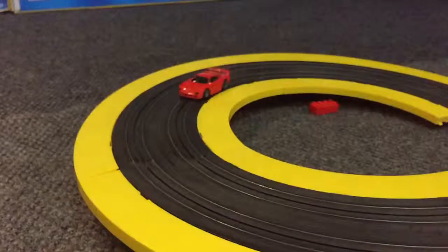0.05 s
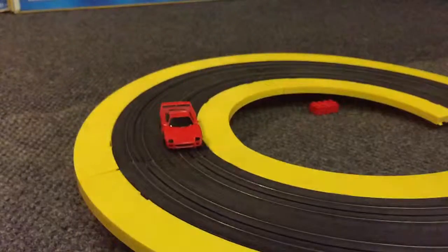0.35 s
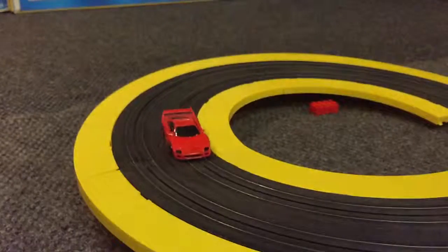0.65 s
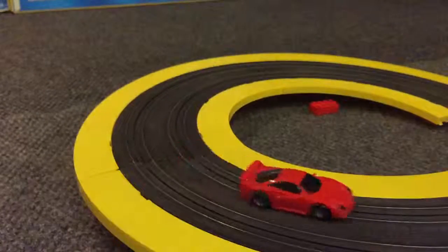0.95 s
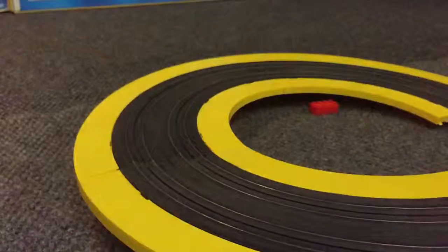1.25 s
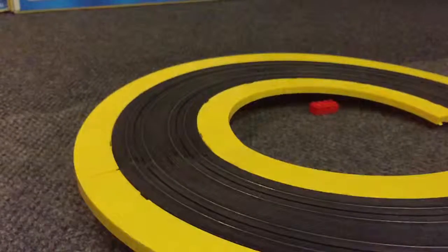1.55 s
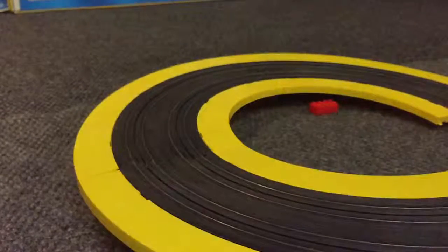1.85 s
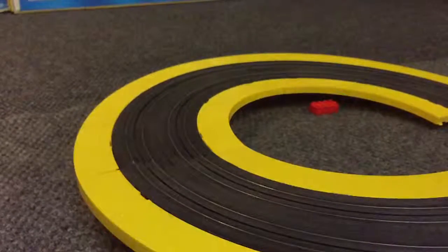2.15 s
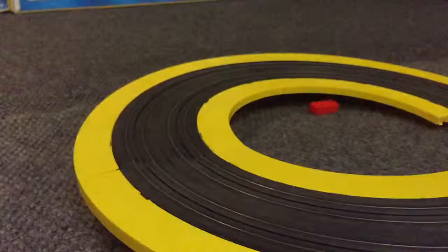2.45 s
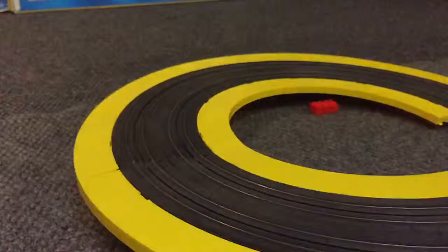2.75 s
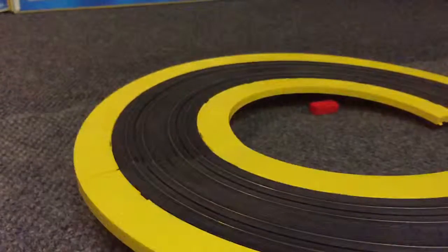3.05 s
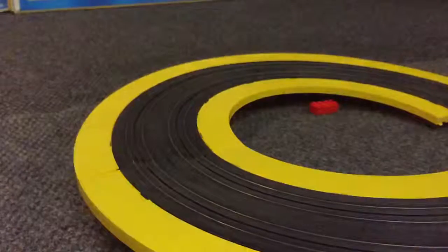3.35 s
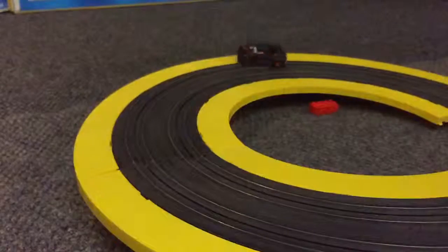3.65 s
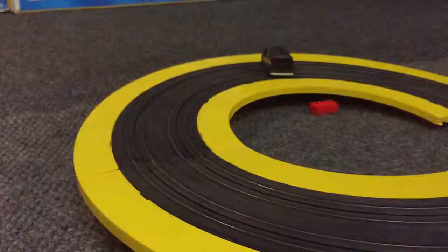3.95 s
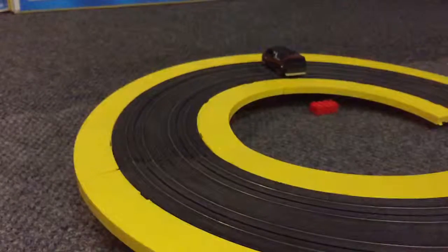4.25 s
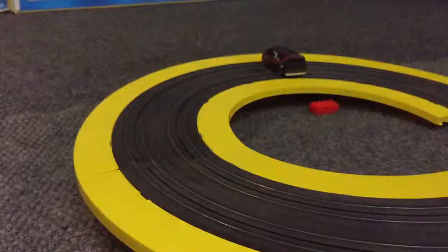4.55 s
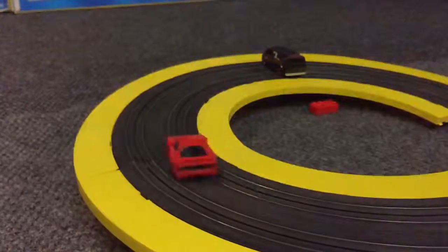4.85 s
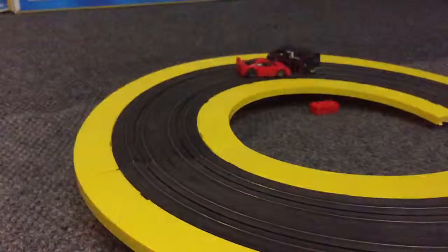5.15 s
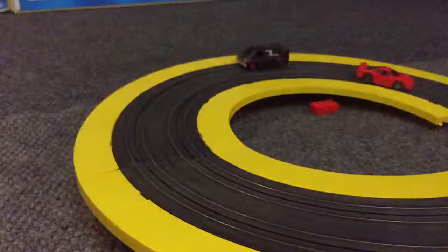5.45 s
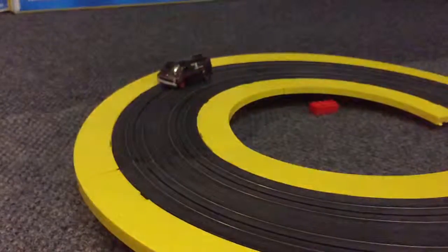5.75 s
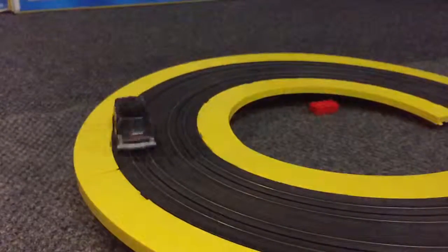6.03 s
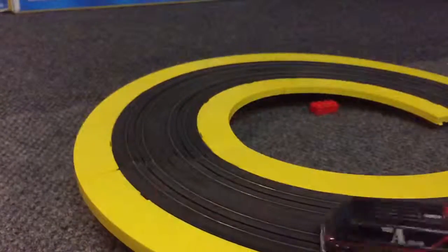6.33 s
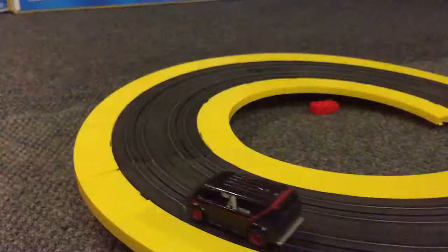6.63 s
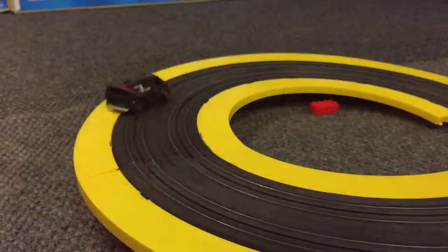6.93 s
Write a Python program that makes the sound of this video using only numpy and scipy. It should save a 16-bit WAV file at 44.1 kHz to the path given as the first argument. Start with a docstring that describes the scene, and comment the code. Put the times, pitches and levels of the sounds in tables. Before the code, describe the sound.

Two toy slot cars whir, hiss and rattle around a hollow plastic track, clicking over the joints close by.

```python
"""Tyres drum on a hollow plastic track as two toy slot cars lap it, close by, on a carpet.
Gears and guide pins rattle the shells, and pickup shoes hiss along the metal rails. The red car
stalls, creaks and shudders off again; cars scrape through bends and knock over joints. Near the end
a shoe sings and the van clatters through the near bend. A faint mains hum lies in the small, dead room."""
import sys
import numpy as np
from scipy import signal
from scipy.fft import rfft, irfft
from scipy.io import wavfile
from scipy.ndimage import map_coordinates

SR = 44100
rng = np.random.default_rng(int(sys.argv[2]) if len(sys.argv) > 2 else 0)


def to_wav(sig):
    """Store sig (one row per channel, or 1-D mono) as 16-bit WAV at the path in sys.argv[1].

    Samples outside -1..1 are clipped; the rate is SR.
    """
    pcm = np.clip(np.atleast_2d(sig), -1, 1) * 32767
    pcm = np.round(pcm).astype(np.int16)
    wavfile.write(sys.argv[1], SR, pcm.T)  # frames by channels


N = 312669
T = np.arange(N) / SR
BINS_HZ = np.arange(N // 2 + 1) * SR / N


# how hard the cars run as they lap: time_s, level_db, extra_hiss_db
LAP_LEVELS = [(0, -46.5, 3.5), (0.33, -42.5, 1.5), (0.83, -45, 5), (1.07, -39.5, 2), (1.26, -36, 2.5),
              (1.285, -43.5, 3), (1.96, -42.5, 1.5), (2.18, -47.5, -0.5), (2.56, -49.5, -8.5),
              (2.89, -52, -4.5), (2.92, -47, -0.5), (3.46, -40, 0), (3.56, -42.5, 4), (4.17, -38.5, -1),
              (4.42, -44, 4), (4.51, -45, 7.5), (4.56, -39.5, 4.5), (4.75, -38, 7), (5.2, -38, 3.5),
              (5.37, -42, 1), (5.62, -40, 2.5), (5.85, -43, -2.5), (5.99, -38, 3), (6.8, -39, 7),
              (7.08, -39, 3.5)]
VAN_START_S, FAR_BELOW_DB = 2.6, -46

def rolling():
    """Levels of track, shell and shoes in dB: all follow one rolling level and the speed."""
    time_s, level_db, extra_hiss_db = np.transpose(LAP_LEVELS)
    lap_db = np.interp(T, time_s, level_db)
    rolling_db = lap_db + 20 * np.log10(stall())
    van = T > VAN_START_S  # the van rattles more and drums less
    far_db = 0.62 * np.minimum(lap_db - FAR_BELOW_DB, 0)  # far off, the shell fades fastest
    rumble_db = rolling_db + 2 - 1.35 * van
    rattle_db = rolling_db + 0.8 + 2.25 * van + far_db
    hiss_db = rolling_db + 3.5 + np.interp(T, time_s, extra_hiss_db)
    return rumble_db, rattle_db, hiss_db


def contact_pressure(turn_hz, whirr_db, chatter_db, hop_db):
    """Pressure in dB: it ripples once a gear turn, chatters, and jumps when a car lands from a hop."""
    turns = np.cumsum(turn_hz * np.exp(0.57 * walk(2) + 0.047 * walk(50))) / SR
    whirr = np.cos(2 * np.pi * turns)
    return whirr_db * whirr + chatter_db * walk(260) + hop_db * hops(rate=70, settle_s=0.0068)


# tone of the hollow track: freq_hz, gain_db
TRACK_TONE = [(100, -44.5), (230, -21.5), (340, -17), (440, -13.5), (590, -9.5), (720, 1), (860, 0),
              (1140, 2), (1220, 5.5), (1310, 2.5), (1650, 1.5), (2100, -5), (3200, -37.5)]
# the track's bass, which carries while a car is on the near bend: time_s, gain_db
TRACK_BASS = [(0, -3.5), (.9, 3.5), (1.35, -2), (1.9, -3.5), (2.7, -4), (3.2, -0.5), (3.6, -2.5), (4, 1.5),
              (4.9, 0.5), (5.7, -0.5), (6.15, 6), (6.5, -3), (7, 3)]

def track_drum(teeth, pressure_db, gain):
    """Tyres drum on the hollow track and feel every hop."""
    force = teeth * unit(undb(1.42 * pressure_db + 0.58 * walk(22))) * gain
    force = shelf(force, from_hz=620, full_hz=382, db=curve(TRACK_BASS) + 1.3 * walk(9))
    return shifting_ring(force, TRACK_TONE, detune=0.035, rate=9)


# tone of a car's shell: freq_hz, gain_db
SHELL_TONE = [(900, -30), (1500, -7.5), (1900, 2.5), (2500, 3), (3000, 3), (3500, 2.5), (3850, 4),
              (4200, 3), (4480, -3.5), (4800, -6), (7000, -14.5)]
# its top ring near 4 kHz, changing as the cars turn: time_s, gain_db
SHELL_BRIGHTNESS = [(0, 2), (1.1, -1.5), (1.45, 7), (1.85, 0.5), (2.2, 0.5), (2.7, -5), (3.2, -1.5),
                    (3.5, -1.5), (4.1, 0.5), (4.9, 0), (5.7, -1.5), (6.3, 3), (6.55, 2.5), (7, 3)]

def shell_rattle(teeth, pressure_db, gain):
    """Gear teeth shake the plastic shell."""
    force = teeth * unit(undb(1.1 * pressure_db + 1.04 * walk(25))) * gain
    force = shelf(force, from_hz=2400, full_hz=3640, db=curve(SHELL_BRIGHTNESS))
    return shifting_ring(force, SHELL_TONE, detune=0.04, rate=7)


# tone of the metal pickup shoes: freq_hz, gain_db
SHOE_TONE = [(2800, -40), (4400, -2.5), (4950, -4), (5500, -1), (6100, 2), (7500, 1), (8400, 3.5),
             (9600, 2.5), (10350, -2.5), (10900, 0.5), (13000, 0.5), (15200, -0.5)]
# their top fizz, beamed and easily shaded on the lap: time_s, gain_db
SHOE_FIZZ = [(0, 2.5), (1.6, -2.5), (2.75, -10), (3.2, -6), (3.6, -0.5), (5.1, -2.5), (5.6, 2.5),
             (6.2, -2.5), (6.7, 1), (7.09, -1)]

def shoe_hiss(pressure_db, gain):
    """Sprung shoes slide on the rails and tick as they catch on specks and seams."""
    rails = grit(rate=6000, spread_db=3.5, smooth_db=0.5)
    catch_db = 0.53 * hops(rate=110, settle_s=0.00066)
    force = rails * unit(undb(1.75 * pressure_db + catch_db)) * gain
    force = shelf(force, from_hz=6200, full_hz=12200, db=curve(SHOE_FIZZ) + 0.47 * walk(27))
    return ring(force, colour(SHOE_TONE))


def pin_rattle(rate=330, low_hz=1000, high_hz=4400, decay_cycles=4.5, spread_db=14.5, bunching=0.6):
    """The guide pin taps the slot walls in flurries; every tap has its own pitch and strength."""
    starts = np.flatnonzero(rng.random(N) < rate / SR * np.exp(bunching * walk(18)))
    age, taps = T[:SR // 100], np.zeros(N + SR)
    for start, (pitch, size) in zip(starts, rng.random((len(starts), 2))):
        hz = low_hz * (high_hz / low_hz) ** pitch
        envelope = undb(spread_db * size) * np.sqrt(hz) * np.exp(-age * hz / decay_cycles)
        taps[start:start + len(age)] += envelope * np.sin(2 * np.pi * hz * age)
    # the slot walls radiate only within the range of their modes
    return unit(butter(taps[:N], 6, [low_hz, high_hz], "bandpass"))


# mains hum: pitch_hz, level_db
HUM_TONES = [(49.5, -81), (59.3, -77.5), (120, -79)]
# tone of the still air: freq_hz, gain_db
AIR_TONE = [(20, -48), (36, -25), (55, -9), (85, -13), (130, -6.5), (190, -4.5), (400, -17), (1200, -24),
            (2500, -32), (5000, -17), (15000, -55)]

def hum_and_air(waver_db=1.5, air_db=-71):
    """Still air and a slightly wavering electrical hum whose two lowest tones beat."""
    hum = 0
    for hz, db in HUM_TONES:
        amplitude = np.sqrt(2) * undb(db + waver_db * walk(2.94))
        hum += amplitude * np.sin(2 * np.pi * (hz * T + rng.random()))
    return hum + undb(air_db) * ring(rng.standard_normal(N), colour(AIR_TONE))


def stall(halt_s=0.44, coast_s=0.13, restart_s=0.62, speed_up_s=0.25):
    """Gain from speed: the red car coasts evenly to a halt, stands, then gathers speed evenly."""
    speed = np.clip(np.maximum((halt_s - T) / coast_s, (T - restart_s) / speed_up_s), 0, 1)
    return speed ** 1.33 + undb(-45)  # a little still stirs at rest


# bumps, skids and grinds: start_s, length_s, level_db, hiss_offset_db, rumble_offset_db
SLOT_SCRAPES = [ (0.382, .04, -58, 2, -9), (0.52, .013, -57.5, -9, -25), (0.558, 0.064, -69, -9, -7),
                (0.616, 0.0022, -51, 3, 1.5), (0.624, 0.013, -58, -12, 6), (.67, 0.044, -57, 2, -1.5),
                (0.757, .003, -41, 9.5, -17), (0.775, 0.029, -44.5, 7, -6), (0.97, .004, -32.5, 2.5, -3),
                (0.983, 0.0064, -36, 4, 2), (1.038, 0.0054, -35, 3, 3.5), (1.066, 0.0039, -44, -5, 6.5),
                (1.1, 0.0074, -28, -0.5, -12), (1.152, 0.028, -38.5, 9, -4), (1.172, 0.0045, -32, -2, -1),
                (1.178, 0.028, -45.5, -4, 8), (1.218, .01, -35, 5, -2), (1.246, 0.0066, -35, 8, -5),
                (1.258, 0.0091, -34.5, 9.5, -5), (1.638, 0.0078, -37.5, 5.5, 2.5),
                (1.661, 0.015, -35.5, 4.5, 1), (2.103, .009, -38, 5, -4), (2.109, 0.0098, -35.5, -3, -2),
                (2.249, 0.015, -41.5, 3, 0), (2.264, 0.028, -46.5, 2, 4.5), (2.37, 0.046, -42.5, -5, 2.5),
                (2.624, 0.0092, -40, 0, -8), (2.633, 0.054, -44, 0, -6), (2.916, 0.0074, -45.5, 6, -15),
                (2.954, 0.011, -40, 2.5, -1), (2.995, .013, -37, -1, -5), (3.072, .006, -37, -5, -17),
                (3.262, 0.014, -35, 4, -8), (3.322, 0.012, -30, -7, -7), (3.453, 0.0089, -34, -4, -1),
                (3.47, 0.014, -29.5, 1, -4), (3.688, .004, -41, 12, -8), (3.774, 0.028, -36, -5, -4),
                (3.838, 0.022, -35, -3, -1), (3.994, 0.026, -36, 4.5, 0.5),
                (4.084, 0.0058, -28.5, -2, -3.5), (4.108, 0.036, -37.5, 1, -2),
                (4.176, .0053, -32.5, 4, -14), (4.338, .005, -34.5, 0, -1),
                (4.4418, 0.0038, -37.5, 14, -17), (4.449, 0.012, -31.5, 5, -2),
                (4.605, 0.0041, -38.5, 6, 5), (4.751, .008, -27.5, 5, -3), (4.765, .004, -32, 6, 3.5),
                (4.846, 0.0046, -29, -3, 0), (4.869, .005, -28, 1.5, -11), (4.924, 0.0062, -38.5, -2, 7.5),
                (4.946, 0.034, -36.5, 7, -3), (5.002, 0.0087, -45, 1.5, 8), (5.228, 0.0042, -25, -4, -13),
                (5.2373, 0.0055, -24, 6.5, -4), (5.458, 0.0053, -35.5, 3.5, 3), (5.645, 0.04, -35, 0, -10),
                (5.952, 0.0054, -30, -5, -16), (6.18, 0.021, -32, 5, -7),
                (6.285, 0.027, -35.5, -10.5, -2.5), (6.473, 0.0067, -25, -1, -2),
                (6.502, .004, -28, 2, -13), (6.515, .003, -31, 1, -16), (6.563, .003, -28.5, 0, -8),
                (6.682, 0.032, -30, 1, -6), (6.73, .003, -31, 3.5, -8), (6.743, 0.0097, -37, -4, 1.5),
                (6.788, .008, -31.5, -6, -13), (6.88, .022, -39, 9, -18)]

def scrapes():
    """Extra power that a car scraping in the slot puts into track, shell and shoes."""
    power = np.zeros((3, N))
    for start_s, length_s, db, hiss_db, rumble_db in SLOT_SCRAPES:
        power += (undb([[rumble_db], [0], [hiss_db]]) * burst(start_s, length_s, db)) ** 2
    return power


# hits on the track joints: start_s, level_db, pitch_hz, rise_ms
JOINT_KNOCKS = [(.523, -46, 3070, 2.2), (.6175, -44, 1000, 1.2), (1.2545, -21, 3600, .5),
                (1.2665, -21, 2900, .5), (2.6256, -16, 2500, .5), (2.999, -32, 2500, 1),
                (3.4715, -19, 1900, .35), (4.1762, -17, 13000, .4), (4.4424, -16, 7000, .25),
                (5.2382, -17, 9000, .3), (5.2435, -15, 3000, .5), (4.850, -20, 3300, .9),
                (6.301, -17, 2000, .6), (6.4545, -19, 2600, .9), (6.4733, -7.5, 2500, .6),
                (6.5057, -14, 3300, .6), (6.6855, -17, 2700, .9), (6.818, -19, 1250, 1.1)]

def knocks(crack_db=-17, crack_decay_s=0.0017):
    """Pin or chassis strikes a joint: a treble crack, and a brief swell of well-damped plastic."""
    body, crack = np.zeros(N), np.zeros(N)
    for start_s, db, hz, rise_ms in JOINT_KNOCKS:
        span = slice(int(start_s * SR), int((start_s + 0.04) * SR))
        age = np.maximum(T[span] - start_s, 0)
        swell = 1000 * age / rise_ms
        body[span] += undb(db) * (swell * np.exp(1 - swell)) ** 2 * np.sin(2 * np.pi * hz * age)
        crack[span] += undb(db + crack_db) * np.exp(-age / crack_decay_s)
    body = butter(body, 2, 400, "highpass")  # the knocks carry no deep bass
    return body + ring(crack * rng.standard_normal(N), colour(SHOE_TONE))


# ring of the creak: pitch_hz, width_hz, gain_db
CREAK_RING = [(2085, 30, 0), (2680, 110, -14)]

def shoe_creak(slips):
    """A shoe sticks and slips as the stalled car starts to creep."""
    return resonate(slips * burst(start_s=0.55, length_s=0.065, db=-63), CREAK_RING)


# ring of the shudder: pitch_hz, width_hz, gain_db
SHUDDER_RING = [(3200, 280, -6), (4060, 170, 4)]

def red_shudder(taps):
    """The red car's body shudders as its tyres bite again."""
    return resonate(taps * burst(start_s=0.745, length_s=0.06, db=-34.5), SHUDDER_RING)


# each car's sweeps through the near bend: nearest_s, level_db, approach_s, retreat_s
RED_SWEEPS = [(1.16, -34.5, 0.11, 0.1), (4.83, -33.5, 0.11, 0.065)]
VAN_SWEEPS = [(6.47, -35.5, 0.12, 0.12), (6.77, -32.5, 0.053, 0.085)]
# ring of the red car's thin body and of the van's: pitch_hz, width_hz, gain_db
RED_RING = [(720, 58, -1), (3260, 200, -2.5), (3690, 120, -4), (4120, 134, -1.5)]
VAN_RING = [(310, 28, -9.5), (433, 61, -10.5), (737, 100, 6.5), (1290, 120, -15), (2570, 200, -1),
            (3020, 770, 6.5)]

def pass_by(taps, sweeps, modes, falloff=1.15):
    """A tapping body rings louder as it comes near and fades as it leaves."""
    power = 0
    for nearest_s, db, approach_s, retreat_s in sweeps:
        distance = np.hypot(1, (T - nearest_s) / np.where(T < nearest_s, approach_s, retreat_s))
        power += (undb(db) / distance ** falloff) ** 2
    return resonate(taps * np.sqrt(power), modes)


# ring of the singing shoe: pitch_hz, width_hz, gain_db
SHOE_RING = [(4620, 200, -2), (6100, 310, 0), (8380, 290, 2.5)]

def singing_shoe(slips, peak_s=6.19, peak_db=-29.5, rise_db_per_s=65, fall_db_per_s=330):
    """Stick and slip rings the thin pickup strip in the near bend: it builds, squeals and dies."""
    fade_db = np.maximum((peak_s - T) * rise_db_per_s, (T - peak_s) * fall_db_per_s)
    squeal = burst(start_s=6.172, length_s=0.021, db=-26)
    return resonate(slips * np.hypot(undb(peak_db - fade_db), squeal), SHOE_RING)


# volleys of clatter: start_s, length_s, level_db
CLATTER_VOLLEYS = [(6.426, .024, -29), (6.447, .005, -23), (6.475, .004, -24), (6.497, .004, -29),
                   (6.502, .006, -23), (6.517, .004, -23.5), (6.536, .012, -28), (6.579, .012, -28),
                   (6.605, .004, -28), (6.668, .005, -29), (6.678, 0.0077, -22), (6.691, 0.021, -27.5),
                   (6.744, .008, -32), (6.77, .005, -31)]
# ring of the clatter: pitch_hz, width_hz, gain_db
CLATTER_RING = [(2040, 150, -3), (2600, 280, 1), (3200, 220, -4.5), (3950, 250, -5)]

def van_clatter():
    """In the near bend the van's loose shell hits its chassis in dense volleys of small taps."""
    volleys = np.sqrt(sum(burst(*row) ** 2 for row in CLATTER_VOLLEYS))
    return resonate(grit(rate=3000, spread_db=2, smooth_db=-1) * volleys, CLATTER_RING)


def cars():
    """One contact pressure drives the friction in track, shell and shoes and the bouncing bodies."""
    rumble_db, rattle_db, hiss_db = rolling()
    pressure_db = contact_pressure(turn_hz=126, whirr_db=0.1, chatter_db=0.25, hop_db=0.87)
    pressure_db *= np.interp(rumble_db, [-47, -38], [0.65, 1.05])  # the room smooths distant running
    load_db = 0.5 * walk(12)  # swells and eases from one piece of track to the next
    rolling_power = undb(np.array([rumble_db, rattle_db, hiss_db]) + load_db) ** 2
    track_gain, shell_gain, shoe_gain = np.sqrt(rolling_power + scrapes())
    teeth = roam(grit(rate=2600, spread_db=2, smooth_db=-1), depth_db=2.3, rate=11)
    track = track_drum(teeth, pressure_db, track_gain)
    shell = shell_rattle(teeth, pressure_db, shell_gain)
    shoes = shoe_hiss(pressure_db, shoe_gain)
    pin = pin_rattle() * undb(rattle_db - 6)
    # loose bodies bounce on their chassis in fewer, harder taps
    taps = grit(rate=1100, spread_db=1.5, smooth_db=-4) * unit(undb(3 * pressure_db)) * stall()
    red = red_shudder(taps) + pass_by(taps, RED_SWEEPS, RED_RING)
    van = pass_by(taps, VAN_SWEEPS, VAN_RING)
    return track + shell + shoes + pin + red + van


def room(x, echo_db, tail_db, t60_s):
    """Add a near reflection and the short tail of a carpeted room; both shift as the cars move."""
    lag_s = 0.0023 + 0.000378 * walk(2.5)
    echo = np.interp(T - lag_s, T, x)
    tails = np.array([reverb(x, t60_s, gap_s=0.004) for _ in range(4)])
    shares = np.array([walk(5) for _ in tails])
    shares /= np.linalg.norm(shares, axis=0)
    return x + undb(echo_db) * echo + undb(tail_db) * np.sum(shares * tails, axis=0)


def far_walls(x, level_db, t60_s, dull_hz):
    """A faint, dull tail comes back from the far walls."""
    return undb(level_db) * reverb(butter(x, 2, dull_hz, "lowpass"), t60_s, gap_s=0.015)


def reverb(x, t60_s, gap_s):
    """Dense reflections: a tail of decaying noise after a short gap."""
    age = T[:SR // 2]
    tail = rng.standard_normal(len(age)) * undb(-60 * age / t60_s) * (age > gap_s)
    return signal.fftconvolve(x, tail / np.linalg.norm(tail))[:N]


def undb(db):
    """Decibels to gain."""
    return 10 ** (np.asarray(db) / 20)


def unit(x):
    """Scale to rms 1."""
    return x / np.sqrt(np.mean(x ** 2))


def curve(points):
    """A fader move through (time_s, gain_db) points."""
    return np.interp(T, *np.transpose(points))


def walk(rate):
    """Smooth random wander of spread 1, through `rate` values a second."""
    knots = rng.standard_normal(N // 16)
    return unit(map_coordinates(knots, [T * rate], order=2, mode="wrap"))


def hops(rate, settle_s):
    """Sudden rises of pressure at random moments, each settling quickly; spread 1."""
    kicks = (rng.random(N) < rate / SR) * rng.uniform(0.83, 1, N)
    load = signal.lfilter([1], [1, -np.exp(-1 / (settle_s * SR))], kicks)
    return unit(load - load.mean())


def grit(rate, spread_db, smooth_db):
    """Tiny uneven collisions, `rate` a second, over a bed of smooth sliding noise."""
    hits = rng.random(N) < rate / SR
    sizes = undb(spread_db * np.minimum(rng.exponential(size=N), 4)) * rng.choice([-1, 1], N)
    return unit(unit(hits * sizes) + undb(smooth_db) * rng.standard_normal(N))


def burst(start_s, length_s, db, release_s=0.0051):
    """Gain of one spell of friction: short bumps bite at once, long skids build up gently."""
    age = np.maximum(T - start_s, 0)
    rise_s = length_s ** 2 / 0.49
    release = np.minimum(np.maximum(age - length_s, 0) / release_s, 20)
    return undb(db) * (1 - np.exp(-age / rise_s)) * np.exp(-release)


def butter(x, order, hz, kind):
    """Butterworth filter."""
    return signal.sosfilt(signal.butter(order, hz, kind, fs=SR, output="sos"), x)


def shelf(x, from_hz, full_hz, db):
    """Lift or lower one end of the spectrum by a moving level."""
    end = irfft(rfft(x) * np.clip((BINS_HZ - from_hz) / (full_hz - from_hz), 0, 1), N)
    return x + end * (undb(db) - 1)


def colour(tone, stretch=1):
    """Gain through (freq_hz, gain_db) points, keeping the power of white noise."""
    hz, db = np.transpose(tone)
    return unit(undb(np.interp(np.log(BINS_HZ + 1), np.log(hz * stretch), db)))


def ring(x, gain, size=2048):
    """Minimum-phase filter with this gain over frequency: the body rings after each push."""
    cepstrum = irfft(np.log(gain + 1e-6), N)[:size]
    cepstrum[1:] *= 2
    response = irfft(np.exp(rfft(cepstrum, 2 * size)))[:size]
    return signal.fftconvolve(x, response)[:N]


def resonate(force, modes):
    """A force rings a few modes; small parts radiate no bass."""
    gain = sum(undb(db) / (1 + ((BINS_HZ - hz) / width_hz) ** 2) for hz, width_hz, db in modes)
    radiation = BINS_HZ ** 2 / (BINS_HZ ** 2 + 220 ** 2)
    return ring(force, unit(gain * radiation))


def shifting_ring(x, tone, detune, rate):
    """The plastic rings a little lower or higher from one place on the lap to the next."""
    place = np.clip(walk(rate), -1, 1)
    out = 0
    for step in (-1, 0, 1):
        share = np.maximum(0, 1 - np.abs(place - step))
        out += share * ring(x, colour(tone, stretch=1 + step * detune))
    return out


def roam(x, depth_db, rate, count=5):
    """A moving car meets other modes of the plastic: interleaved narrow bands swell and fade apart."""
    spectrum, octaves = rfft(x), np.log2(BINS_HZ + 1)
    out = 0
    for k in range(count):
        band = np.maximum(0, 1 - np.abs((octaves * count - k) % count - count / 2))
        out += irfft(spectrum * band, N) * undb(depth_db * walk(rate))
    return unit(out)


def scene():
    """The cars in their room, heard from one point, so both channels are alike."""
    toys = cars() + knocks() + van_clatter()
    slips = grit(rate=2800, spread_db=4, smooth_db=-2) * unit(undb(2 * walk(200)))
    toys += shoe_creak(slips) + singing_shoe(slips)
    near = room(toys, echo_db=-13, tail_db=-13, t60_s=0.087)
    far = far_walls(toys, level_db=-22, t60_s=0.24, dull_hz=3000)
    mono = near + far + hum_and_air()
    return np.array([mono, mono])


def record(dry):
    """A steep low-pass cuts the top above 15.5 kHz."""
    return signal.sosfilt(signal.ellip(12, 0.1, 80, 15500, fs=SR, output="sos"), dry)


dry = scene()
out = record(dry)
to_wav(out)
```